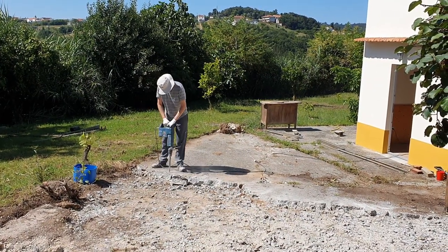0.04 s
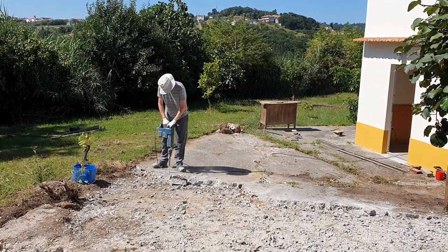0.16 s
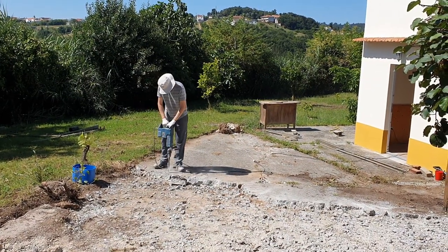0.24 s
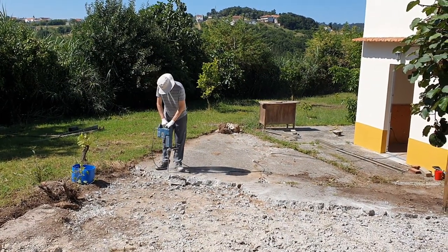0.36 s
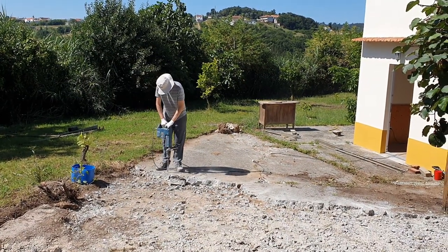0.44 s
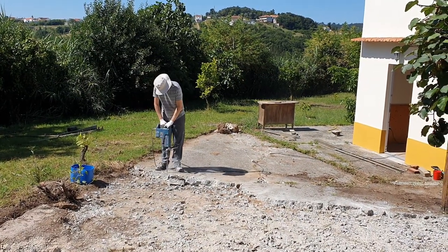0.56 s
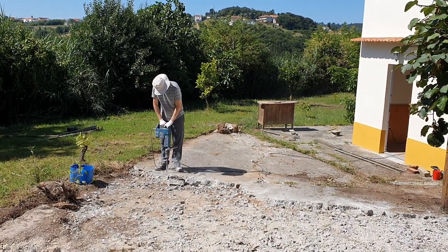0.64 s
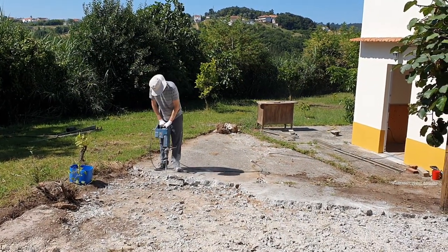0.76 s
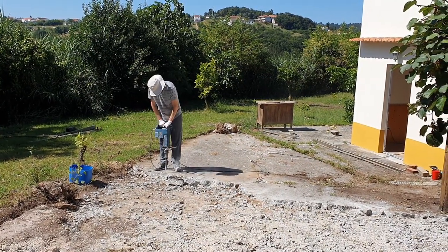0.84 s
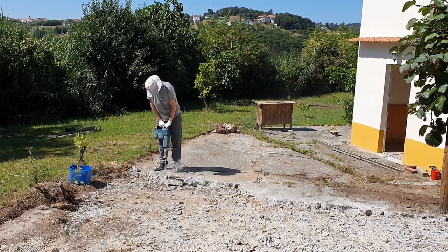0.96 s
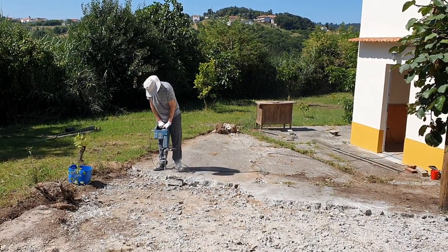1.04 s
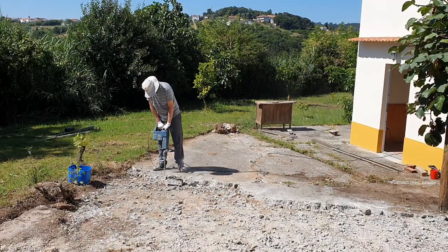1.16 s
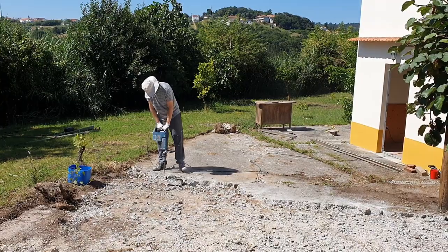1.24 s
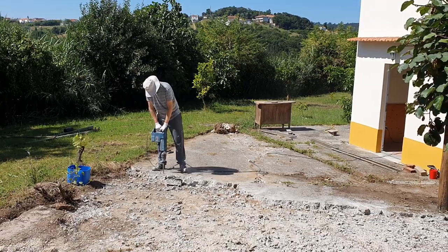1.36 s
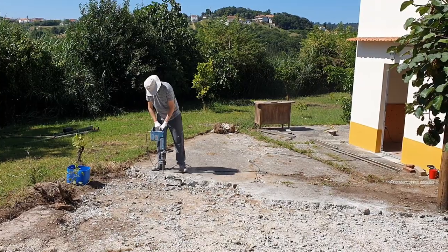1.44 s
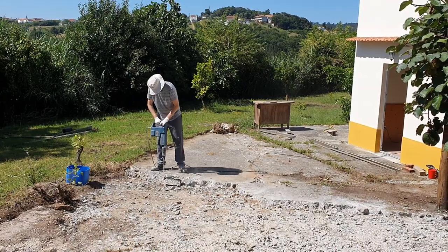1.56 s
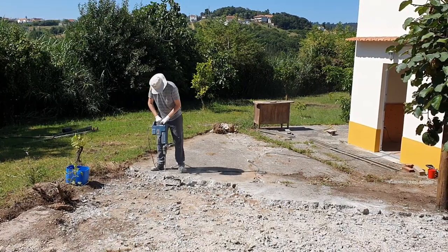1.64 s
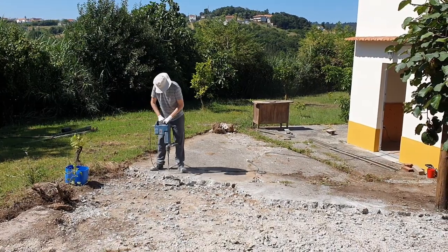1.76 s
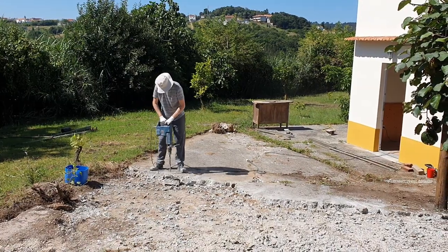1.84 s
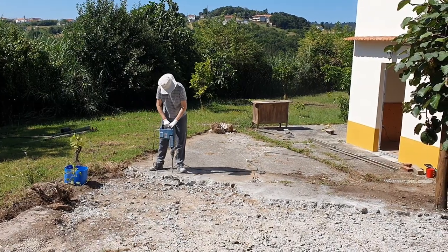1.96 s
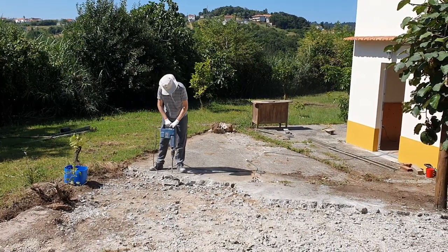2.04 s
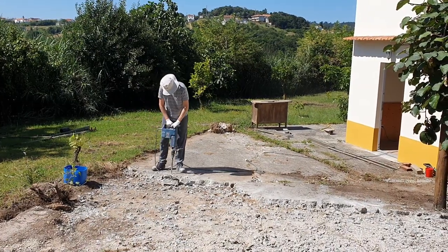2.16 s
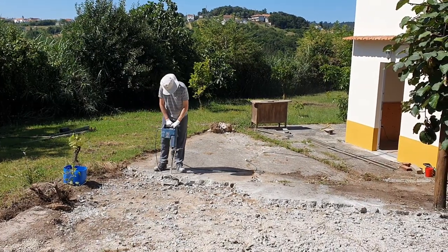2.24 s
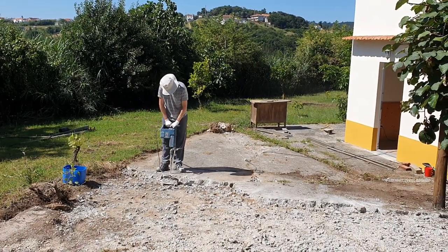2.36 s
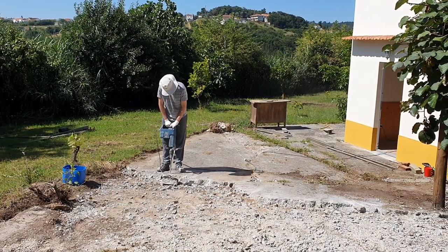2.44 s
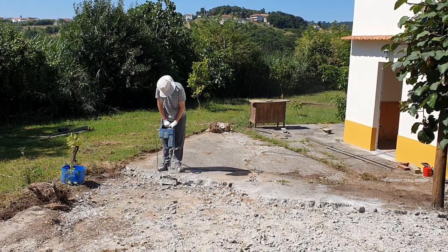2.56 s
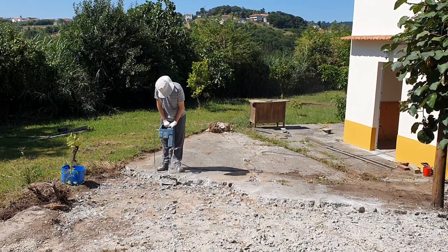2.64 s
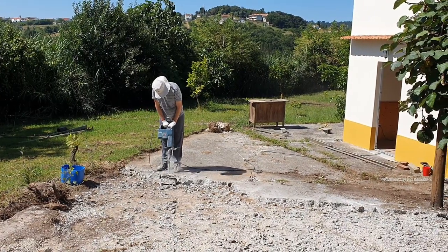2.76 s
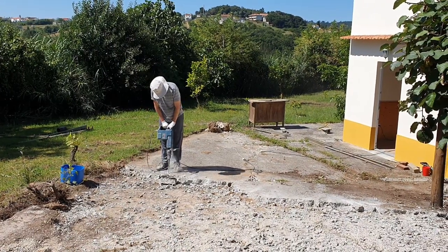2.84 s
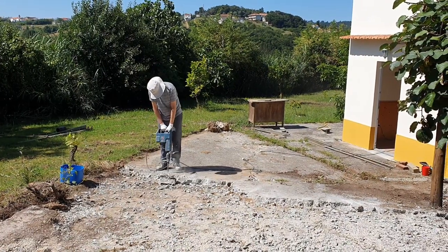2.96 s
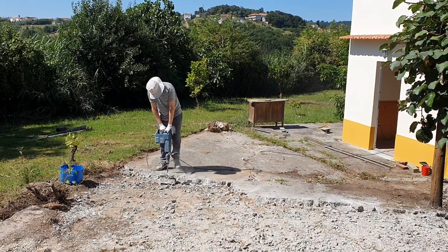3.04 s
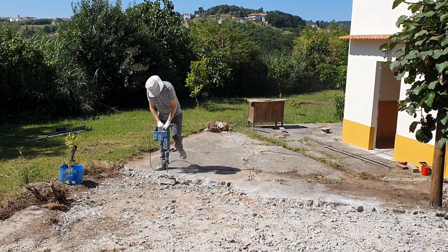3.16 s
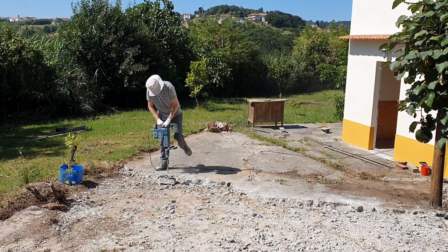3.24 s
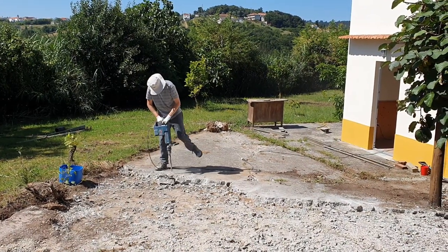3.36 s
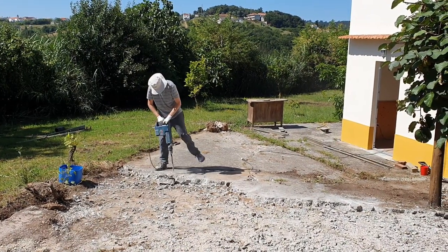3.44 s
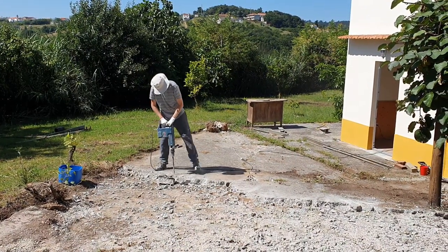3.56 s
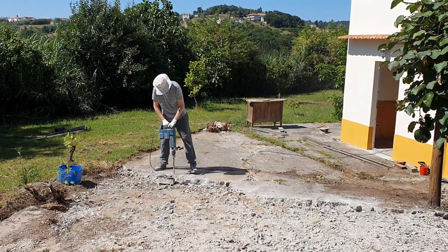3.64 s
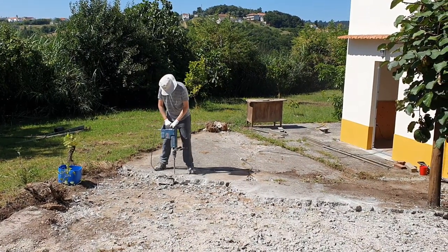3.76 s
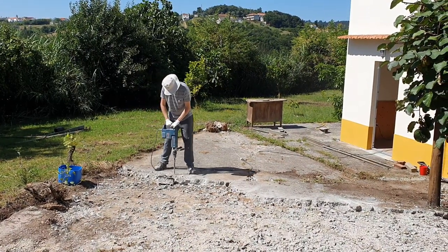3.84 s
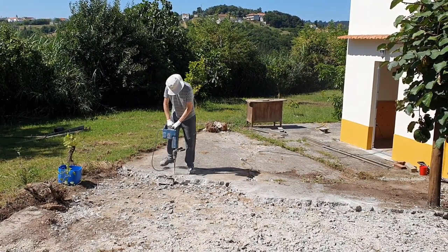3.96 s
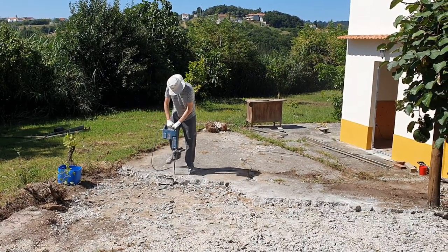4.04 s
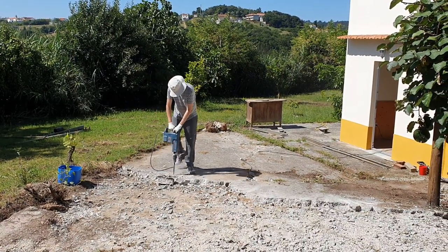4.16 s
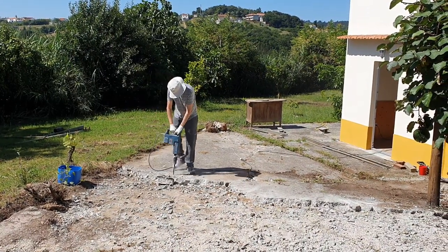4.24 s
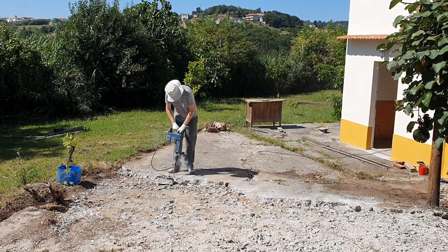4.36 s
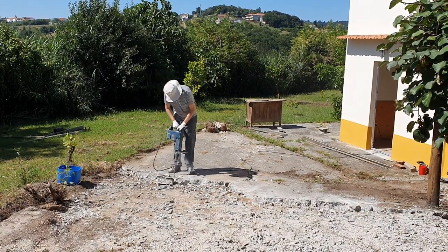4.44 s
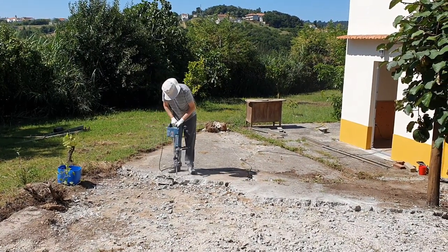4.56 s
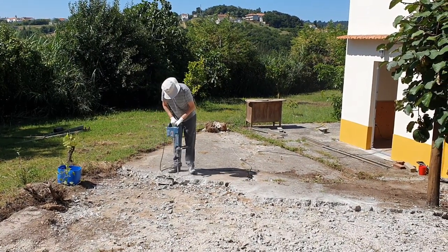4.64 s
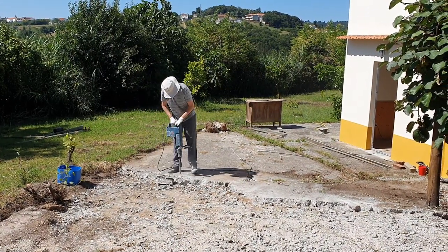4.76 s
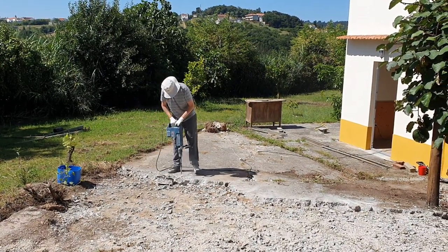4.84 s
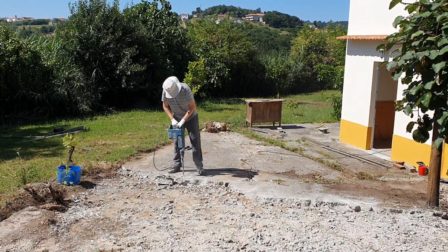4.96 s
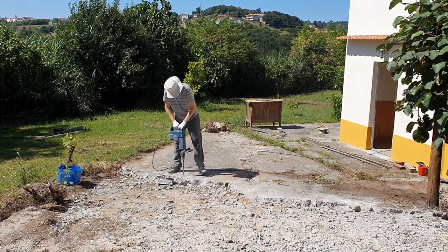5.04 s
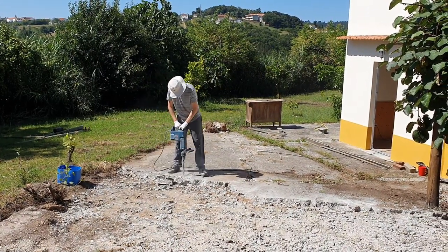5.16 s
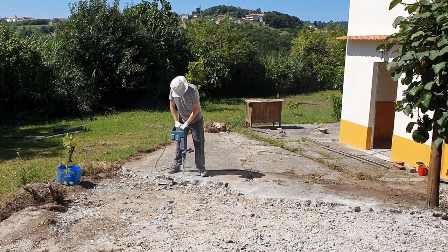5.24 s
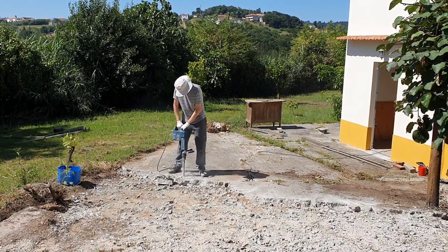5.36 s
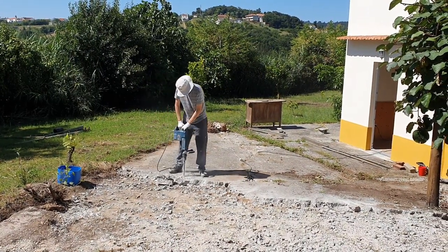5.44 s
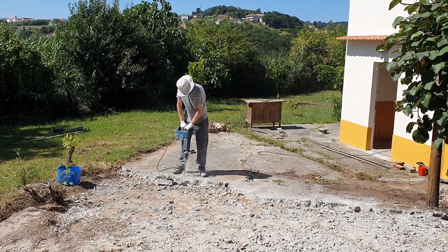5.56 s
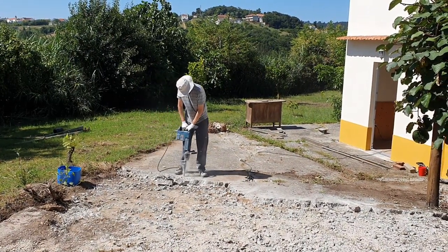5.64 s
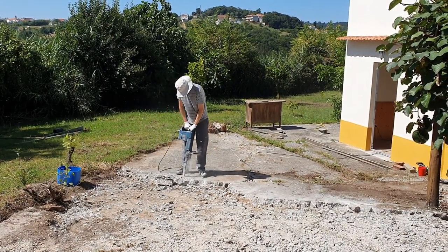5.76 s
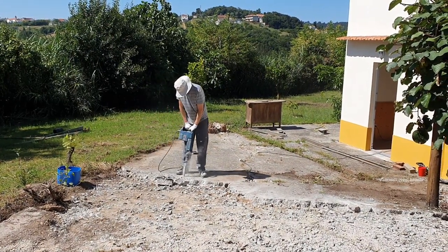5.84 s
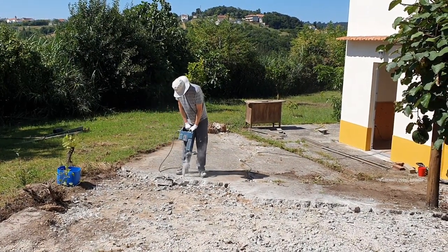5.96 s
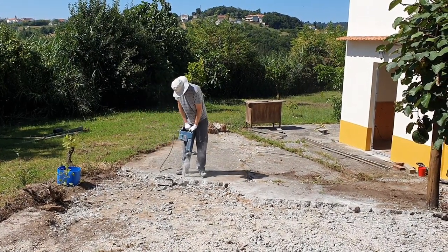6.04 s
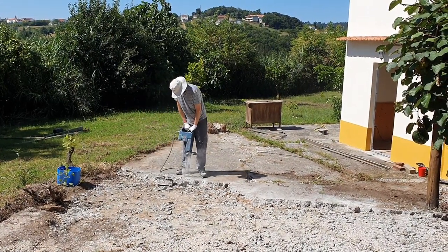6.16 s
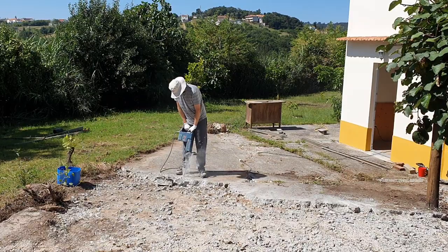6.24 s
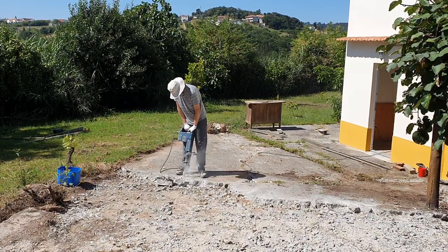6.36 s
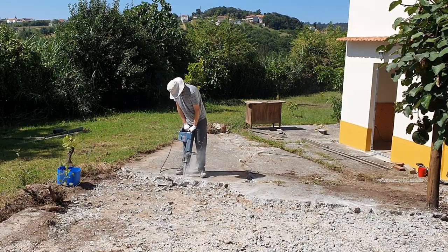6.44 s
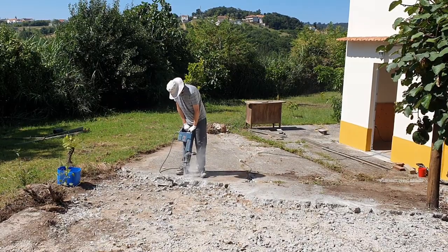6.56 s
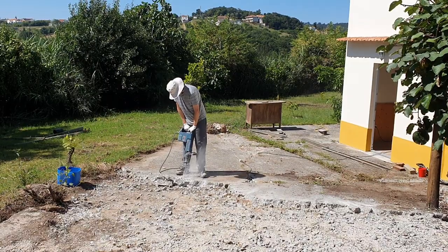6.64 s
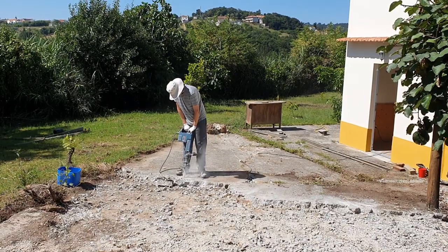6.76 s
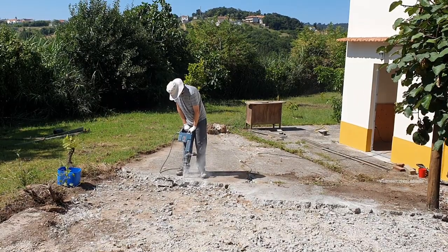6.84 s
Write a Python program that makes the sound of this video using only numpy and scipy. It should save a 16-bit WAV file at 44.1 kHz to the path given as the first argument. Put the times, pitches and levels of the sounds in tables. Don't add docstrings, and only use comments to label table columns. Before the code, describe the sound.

A heavy electric demolition hammer works a concrete slab outdoors, a few metres away. It is pounding from the start, roughly thirty-one blows a second, a dense drumming of low slab thumps, brittle gritty cracks and high steel ringing, easing off by 1.2 s. Two light clacks follow, then motor whirr and fan hush until faint taps before 2 s. A second burst runs 2.0-2.85 s, swelling in the middle and trailing into loose metallic clinks to about 3 s. Idle whirr, a few separate knocks near 3.6 and 3.75 s, then a very short burst from 3.8 to 4.1 s, ending in scattered sharp clacks. The motor idles again until chisel rattles at about 5 s lead into the longest, steadiest burst, 5.1-6.9 s, brighter and crunchier. A nearby wall on the right returns a quick slap; trees scatter a short, faint tail.

```python
import sys
import numpy as np
from scipy import signal
from scipy.fft import rfft, irfft, next_fast_len
from scipy.io import wavfile
from scipy.ndimage import uniform_filter1d, map_coordinates

SR = 44100
rng = np.random.default_rng(int(sys.argv[2]) if len(sys.argv) > 2 else 0)


def undo_db(level):
    steps = np.asarray(level, float) / 20
    return 10 ** steps


def wrap_up_sound(samples):
    columns = np.atleast_2d(samples).T
    tamed = np.clip(columns, -1, 1)
    steps = np.round(tamed * 32767).astype(np.int16)
    wavfile.write(sys.argv[1], SR, steps)


N = 303849

CRANK_HZ = 31.47
FULL_PUSH_DB = -22

# start_s, end_s, striker lateness at the start first_ms, at the end last_ms
BURSTS = [
    (0, 1.24, 10.0, 10.5),
    (1.99, 2.85, 5.8, 7.2),
    (3.77, 4.09, 1.6, 4.8),
    (5.13, 6.89, 0.8, -1.2),
]
# time_s, push_db, chisel looseness_db
PUSH = [
    [(0, -27, 4), (.28, -25.5, 0), (.41, -24.5, 1.5), (.55, -23.5, -2), (.83, -23, -0.5), (.96, -30.5, -2),
     (1.12, -34.5, -4), (1.24, -39, 5)],
    [(1.99, -36, -8.5), (2.13, -26.5, -0.5), (2.28, -20.5, 3), (2.56, -21, 1), (2.71, -28.5, -3),
     (2.85, -27, -3)],
    [(3.77, -27, 0.5), (3.88, -23.5, 2), (3.98, -25.5, -3), (4.09, -37, 2)],
    [(5.13, -31.5, 1.5), (5.26, -25, -1.5), (5.6, -24.5, 1.5), (5.9, -25, 3), (6.14, -23, 0),
     (6.5, -22.5, -1.5), (6.89, -23, -1.5)],
]
# [(centre_hz, width_hz, level_db)]
SPOTS = [
    (1.6, [(65, 40, -8), (142, 65, 4), (340, 130, -5), (460, 110, -4), (570, 96, -6), (700, 80, -8), (1150, 120, -9), (1400, 150, -16), (1700, 250, -7), (3000, 1900, -22)]),
    (3.3, [(66.4, 53, -16), (141, 62, 2.5), (300, 120, -15), (443, 110, -2), (555, 65, -0.5), (870, 80, -5), (1664, 150, -14.5), (3260, 2900, -23.5)]),
    (4.9, [(66, 36, -13), (141, 70, 2), (380, 260, -15.5), (557, 64, 1.5), (920, 240, -11), (1720, 210, -16), (3230, 1100, -13.5)]),
    (7.0, [(66, 33, -16), (138, 62, 1.2), (372, 45, -1.5), (486, 110, -0.7), (655, 75, -2.5), (900, 200, -11.5), (1150, 140, -9), (1500, 200, -8), (1945, 154, -6.5), (3000, 1750, -10)]),
]


def unit(x):
    return x / np.sqrt(np.mean(x ** 2) + 1e-20)


def along(points, hz):
    f, v = np.transpose(points)
    return np.interp(np.log(hz + 1), np.log(f + 1), v)


def filtered(x, response):
    m = next_fast_len(N + SR // 2)
    return irfft(rfft(x, m) * response(np.fft.rfftfreq(m, 1 / SR)), m)[..., :N]


def resonant(modes, flip=-1):
    def response(f):
        total = 0
        for k, (centre, width, db) in enumerate(modes):
            damping = 1j * f * width
            total = total + flip ** k * undo_db(db) * damping / (centre * centre - f * f + damping)
        return total
    return response


def wobble(rate):
    knots = rng.standard_normal(int(N * rate / SR) + 4)
    return map_coordinates(knots, [np.arange(N) * rate / SR])


def laid(s, rows):
    at = np.round(s * SR).astype(int)[:, None] + np.arange(rows.shape[1])
    return np.bincount(at.ravel(), rows.ravel(), N + SR)[:N]


def spot_of(hits):
    return np.searchsorted([end for end, modes in SPOTS], hits[:, 0])


def turns():
    s = np.arange(int(N / SR * CRANK_HZ) + 1) / CRANK_HZ
    start, end, first_ms, last_ms = np.transpose(BURSTS)
    drift_ms = np.interp(s, np.ravel([start, end], 'F'), np.ravel([first_ms, last_ms], 'F'))
    when, push_db, _ = np.vstack(PUSH).T
    late_ms_per_db = .12
    late_ms = late_ms_per_db * (FULL_PUSH_DB - np.interp(s, when, push_db))
    return s + (drift_ms + late_ms) / 1000


def blows():
    # time_s, crack_db, slab_db, shank_db, tip_db
    strays = [(1.2516, -20, -32.5, -34, -30), (1.3143, -22, -35.5, -24, -32), (1.876, -55, -42, -60, -60),
              (1.908, -55, -39, -60, -60), (1.94, -50, -38, -55, -50), (1.9707, -29, -34, -44, -29),
              (2.8674, -14.5, -29, -17, -20), (2.9036, -17.5, -45, -34, -37),
              (2.9649, -25, -41, -25.5, -36), (3.0302, -27, -43, -38, -41), (3.5536, -47, -33.5, -48, -38),
              (3.628, -22, -23.5, -19.5, -20.5), (3.7543, -21.5, -23, -17.5, -17),
              (4.1056, -21, -51, -17, -14.5), (4.166, -18, -27, -21, -18), (4.198, -7, -43, -46, -40),
              (4.2619, -17.5, -30.5, -20.5, -25), (4.9706, -26, -38, -36, -28),
              (5.022, -20, -25.5, -17.5, -19), (5.0524, -21, -20.5, -12, -9), (5.0834, -15, -26, -19, -16),
              (5.1167, -24, -23.5, -17, -12)]
    # crack_db, shank_db, tip_db, crack_slope [dB/s], tip_slope [dB/s] as the tip sinks in
    bite = [
        (-34, -30, -17.5, 1.5, -6.5),
        (-33.5, -28, -20, -0.5, -1),
        (-33, -25.5, -24.5, 14, -2),
        (-35.5, -28, -19.5, 4.5, -4.5),
    ]
    crack_follows, tip_follows = 0.23, 0.38
    s = turns()
    luck = rng.standard_normal((len(s), 5)) * [.00013, 1.5, .8, 2, 2]
    rows = [np.array(strays) + [0, -16.5, -7, -9.5, -8.0]]
    for (start, end, *_), push, levels in zip(BURSTS, PUSH, bite):
        crack_db, shank_db, tip_db, crack_slope, tip_slope = levels
        on = (s >= start) & (s <= end)
        when, *controls = np.transpose(push)
        push_db, loose_db = (np.interp(s[on], when, c) for c in controls)
        since = s[on] - start
        eased_db = push_db - FULL_PUSH_DB
        crack = crack_db + crack_slope * since + crack_follows * eased_db
        tip = tip_db + tip_slope * since + loose_db + tip_follows * eased_db
        rows.append(np.transpose([s[on], crack, push_db, shank_db + loose_db, tip]) + luck[on])
    return np.vstack(rows)


def slab(hits):
    out = np.zeros(N)
    t = np.arange(SR // 15) / SR
    push = -undo_db(hits[:, 2:3] + 34) * np.exp(-t / .0001)
    habit = rng.standard_normal((len(SPOTS), len(t)))[spot_of(hits)]
    fresh = rng.standard_normal((len(hits), len(t)))
    shaking = undo_db(14 - 60 * t / .06) * habit + undo_db(14.5 - 60 * t / .09) * fresh
    chatter = undo_db(hits[:, 2:3]) * uniform_filter1d(shaking, size=5)
    for k, (end, modes) in enumerate(SPOTS):
        here = spot_of(hits) == k
        deep_modes = resonant(modes[:2], flip=1)
        heave = lambda f: -undo_db(7) * deep_modes(f) / (1 + 2j * np.pi * f * 0.00096) ** 2
        out += filtered(laid(hits[here, 0], (push + .45 * chatter)[here]), heave)
        out += filtered(laid(hits[here, 0], (push + chatter)[here]), resonant(modes[2:], flip=1))
    t = np.arange(SR // 5) / SR
    edges = rng.standard_normal(len(t)) * undo_db(-60 * t / .16) * (t > .004)
    deep = signal.lfilter([.01], [1, -1.8, .81], edges / np.linalg.norm(edges))
    paths = lambda f: 1 + undo_db(1.5) * rfft(deep, 2 * len(f) - 2)
    return filtered(out, lambda f: paths(f) / np.abs(paths(f)))


def grit(hits):
    # frequency_hz, density_db [dB per Hz]
    grit_spectrum = [(300, -7.5), (1000, -8.5), (2000, -3), (4000, -1.5), (6000, -1), (9000, -5.5),
                     (13000, -11.5), (16000, -35)]
    crispness = [-6.5, -3, 5, 2.5]
    t = np.arange(SR // 18) / SR
    noise = rng.standard_normal((len(hits), len(t)))
    clumps = undo_db(4.1 * unit(uniform_filter1d(rng.standard_normal(noise.shape), 40)))
    spot = spot_of(hits)
    habit = .75 * rng.standard_normal((len(SPOTS), len(t)))[spot] + .66 * noise
    crisp_db = np.take(crispness, spot)[:, None]
    crack = undo_db(13.5 + crisp_db / 2 - 60 * t / 0.018) * habit
    crackle = undo_db(-crisp_db / 2 - 60 * t / 0.099) * clumps * noise
    sound = laid(hits[:, 0], undo_db(hits[:, 1:2]) * (crack + crackle))
    return filtered(sound, lambda hz: undo_db(along(grit_spectrum, hz) + 7))


def chisel(hits, modes_hz, modes, free, level_db, spread_db, rattle):
    t = np.arange(SR // 10) / SR
    out = np.zeros((2, N))
    for hz, (near_db, wall_db, t60, blur_hz), free_db in zip(modes_hz, modes, free):
        luck = rng.standard_normal((len(hits), 5))[:, :, None]
        start_db = (level_db + np.take(free_db, spot_of(hits)))[:, None]
        fade = undo_db(start_db - 60 * t / (t60 * np.exp(0.12 * luck[:, 0])))
        ring = fade * np.sin(2 * np.pi * hz * (1 + 0.0024 * luck[:, 1]) * t + np.pi * luck[:, 2])
        rough = 1 + rattle * wobble(2 * blur_hz)
        out[0] += laid(hits[:, 0], undo_db(near_db + spread_db * luck[:, 3]) * ring) * rough
        out[1] += laid(hits[:, 0], undo_db(wall_db + spread_db * luck[:, 4]) * ring) * rough[::-1]
    return out


def sizzle(hits):
    # frequency_hz, density_db [dB per Hz]
    buzz_spectrum = [(4000, -30), (6000, -4), (8000, 3.5), (11000, -3), (14000, 3), (16000, -8)]
    t = np.arange(SR // 16) / SR
    buzz = undo_db(hits[:, 4:5] - 5.5 - 60 * t / 0.14) * rng.standard_normal((len(hits), len(t)))
    return filtered(laid(hits[:, 0], buzz), lambda hz: undo_db(along(buzz_spectrum, hz)))


def motor():
    # centre_hz, width_hz, level_db
    housing_modes = [(574, 130, 6), (1144, 110, 1.5), (2840, 150, -16), (3640, 250, 1.5), (4650, 85, 3),
                     (4800, 450, -8)]
    gear_modes = [(1885, 90, 2), (1985, 75, 4), (3840, 260, -3.5)]
    # time_s, level_db
    whine = [(0, -36), (.25, -41.5), (.73, -36), (.94, -43.5), (1.25, -36), (1.44, -46), (1.88, -43.5),
             (1.96, -37.5), (2.2, -33), (2.8, -38.5), (3.01, -33), (3.1, -40.5), (3.5, -40), (3.91, -35.5),
             (4.24, -34.5), (4.5, -42.5), (5.03, -40), (5.3, -41), (6.89, -37)]
    idle_db, loaded_db, load_s = -43.5, -38, 0.096
    t = np.arange(N) / SR
    s = turns()
    phase = 2 * np.pi * np.interp(t + 0.0034, s, np.arange(len(s)))
    gear_load = undo_db(7 * np.cos(phase) + 2 * wobble(30))
    gears = unit(filtered(gear_load * rng.standard_normal(N), resonant(gear_modes)))
    housing_load = undo_db(2 * np.cos(phase) + 0.79 * wobble(12))
    housing = unit(filtered(housing_load * rng.standard_normal(N), resonant(housing_modes)))
    working = np.zeros(N)
    for start, end, *_ in BURSTS:
        working += np.clip(np.minimum(t - start, end - t) / load_s + 1, 0, 1)
    housing_db = idle_db + (loaded_db - idle_db) * working
    return undo_db(np.interp(t, *np.transpose(whine))) * gears + undo_db(housing_db) * housing


def placed(x, tilt, lag, delay_s):
    side = np.array([[.5], [-.5]])
    late_s = delay_s + side * lag / SR
    return filtered(x, lambda hz: undo_db(side * along(tilt, hz)) * np.exp(-2j * np.pi * hz * late_s))


def yard(x):
    # frequency_hz, t60_s
    decay = [(200, 0.79), (2000, 0.091), (10000, 0.33)]
    hz, t, z = signal.stft(rng.standard_normal((2, SR // 3)), SR, nperseg=256)
    fade_db = -60 * t / along(decay, hz)[:, None]
    bass_db = -6.0 * (hz < 800)[:, None] - 27 * (hz < 300)[:, None]
    tail = signal.istft(z * undo_db(fade_db + bass_db), SR, nperseg=256)[1]
    late = np.pad(x, (150, 0))[None]
    return signal.fftconvolve(late, tail / np.linalg.norm(tail[0]), axes=1)[:, :N]


def air():
    # frequency_hz, density_db [dB per Hz]
    fan_spectrum = [(15, -38), (25, -1), (80, 8), (153, -10.5), (363, -14.5), (607, -8.5), (1290, -7),
                    (1890, -1.5), (2550, -4.5), (3820, -3), (5140, -7), (14000, -24), (16000, -31)]
    # frequency_hz, likeness [-1 to 1]
    likeness = [(60, 0.94), (180, 0.91), (550, 1), (1650, 0.44), (4970, -0.61), (15000, 0.12)]
    turn = lambda hz: np.arccos(np.clip(along(likeness, hz), -1, 1)) / 2
    shares = lambda hz: undo_db(along(fan_spectrum, hz)) * [np.cos(turn(hz)), np.sin(turn(hz))]
    mid, side = filtered(rng.standard_normal((2, N)), shares)
    return undo_db(-36 + 1.9 * wobble(3.42)) * unit(np.array([mid + side, mid - side]))


def scene():
    shank_hz = [4990, 7180, 7475, 9780]
    tip_hz = [12640, 14085, 15540]
    # to listener near_db, to wall wall_db, t60_s, blur_hz
    shank_modes = [(-13.5, -13, 0.15, 120), (2, -3, 0.083, 150), (4.5, 0.5, 0.07, 82),
                   (-13.5, -10.5, 0.06, 200)]
    tip_modes = [(-9.5, -4.5, 0.051, 100), (-3, -9, 0.12, 49), (-3, -21, 0.064, 300)]
    shank_free = [(-6, -3.5, -10.5, 1), (1, 0.5, 0.5, 0.5), (1, 0, 1.5, -1), (6.5, 5.5, 5.5, 6)]
    tip_free = [(0, 0, 5.4, 0), (0, 0, 4.8, -3), (0, 0, 8.5, 4.5)]
    # frequency_hz, difference_db
    direct_tilt = [(100, -4.5), (500, -2.5), (2000, 2), (5000, 1.5), (9000, 11), (15000, 11.5)]
    wall_tilt = [(100, 0), (500, -0.5), (2000, -24), (5000, -27.5), (9000, -9), (15000, -8)]
    hits = blows()
    steel = chisel(hits, shank_hz, shank_modes, shank_free, hits[:, 3] + 0.67, spread_db=2.5, rattle=0.95)
    steel += chisel(hits, tip_hz, tip_modes, tip_free, hits[:, 4] - 3.5, spread_db=3, rattle=.9)
    thump = slab(hits)
    crack = grit(hits) + sizzle(hits)
    whirr = motor()
    direct = thump + crack + whirr + steel[0]
    dull = undo_db(-5) * signal.lfilter([.006], [1, -1.845, .851], thump)
    bounced = dull + undo_db(-16.0) * crack + undo_db(-20.0) * whirr + undo_db(-0.5) * steel[1]
    heard = placed(direct, direct_tilt, lag=-3.0, delay_s=0)
    heard = heard + placed(bounced, wall_tilt, lag=-1.32, delay_s=.0171)
    return heard + undo_db(-4) * yard(direct) + air()


def low_pass(x):
    return signal.sosfilt(signal.butter(12, 17120, fs=SR, output="sos"), x)


def record(dry):
    loud = dry / (1 + np.abs(dry / .97) ** 4) ** (1 / 4)
    top = lambda hz: np.clip((16000 - hz) / 350, .001, 1)
    mic = filtered(loud, lambda hz: top(hz) / (1 - 1j * 55 / (hz + 1)) ** 2)
    return low_pass(mic)


dry = scene()
out = record(dry)
wrap_up_sound(out)
```